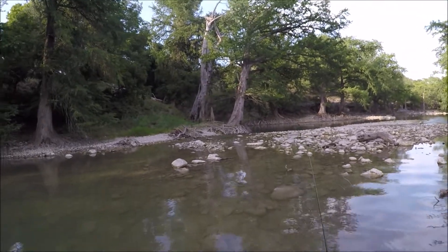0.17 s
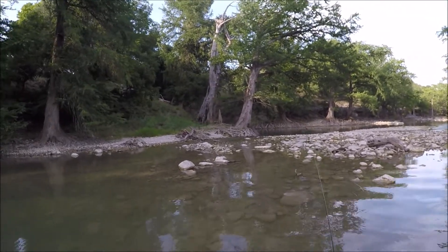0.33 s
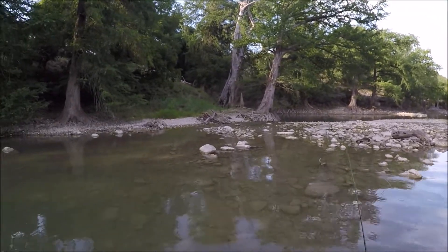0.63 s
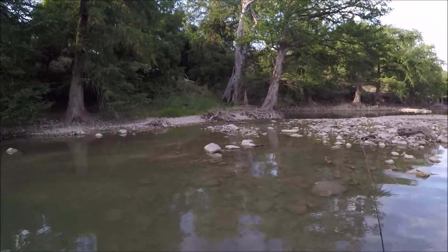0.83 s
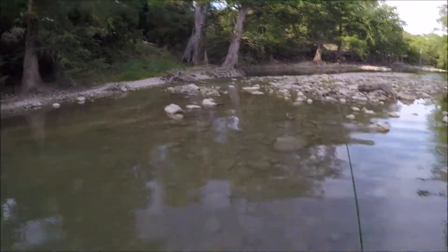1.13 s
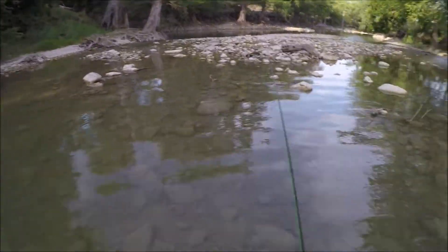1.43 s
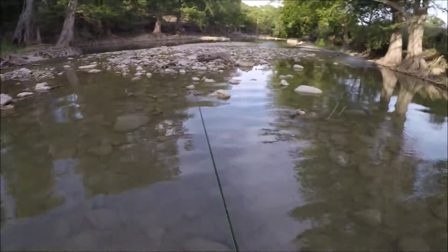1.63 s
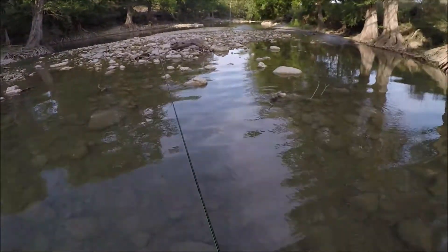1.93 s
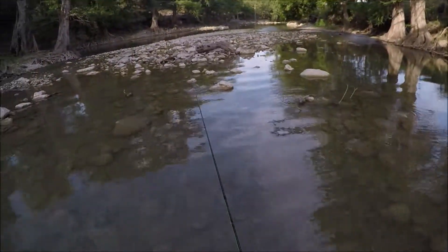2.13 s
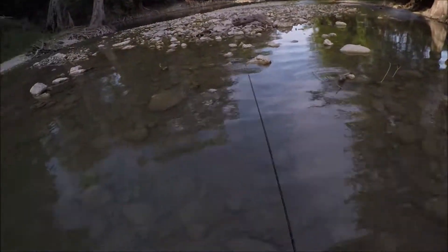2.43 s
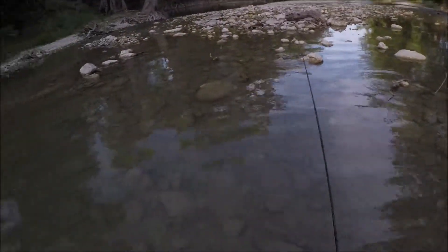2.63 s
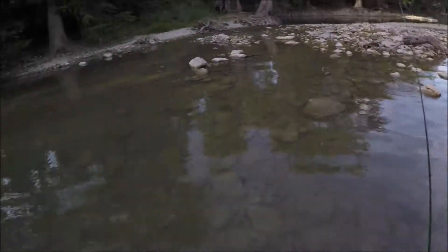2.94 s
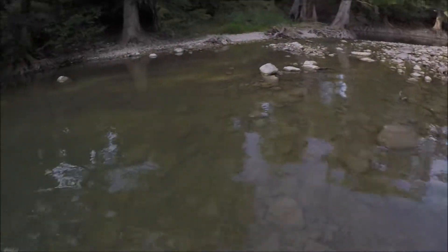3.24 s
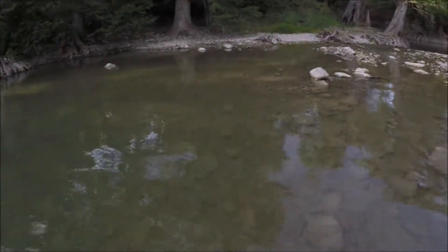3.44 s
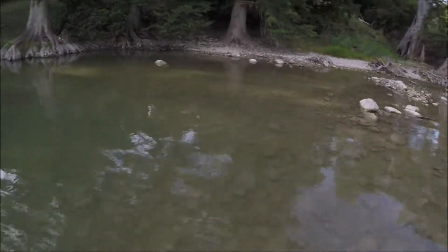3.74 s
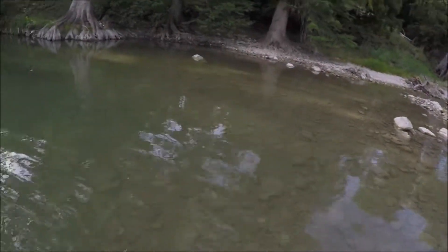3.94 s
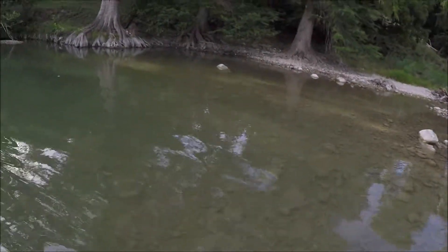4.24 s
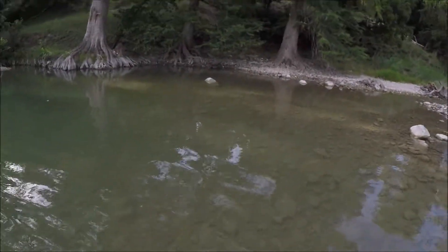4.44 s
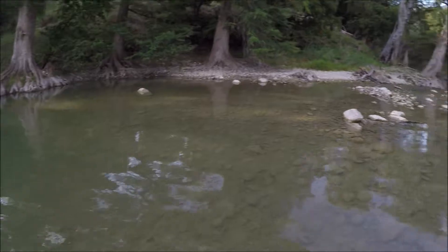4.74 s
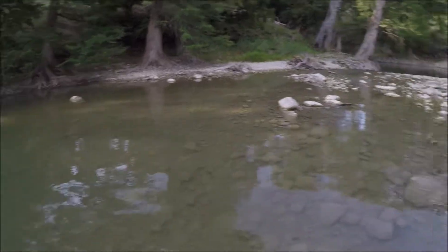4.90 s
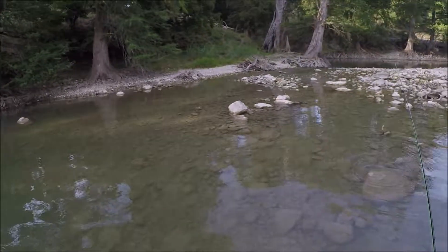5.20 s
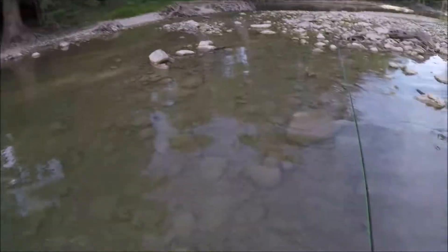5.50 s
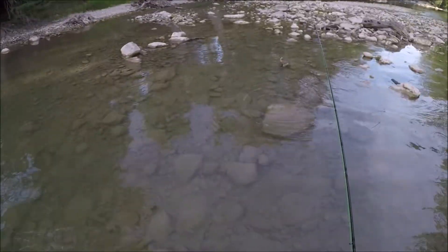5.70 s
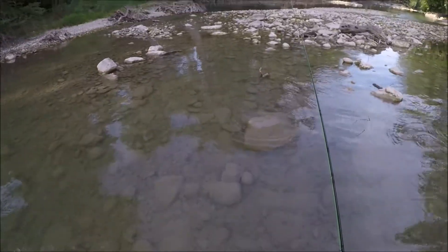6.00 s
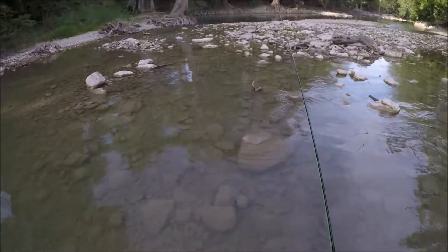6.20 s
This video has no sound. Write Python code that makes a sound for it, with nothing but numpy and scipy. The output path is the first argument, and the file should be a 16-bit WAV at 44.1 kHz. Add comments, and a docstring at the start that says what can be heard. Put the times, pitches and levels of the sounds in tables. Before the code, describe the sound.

Someone wades through a shallow river in slow strides, water sloshing, gurgling and dripping while wind buffets the microphone and a distant bird whistles.

```python
"""Someone wades through a shallow river: each stride churns the water, modelled as swarms of ringing
bubbles and shaped noise, and traps air pockets that gurgle upward in pitch; drops fall back as pings.
Stones knock underfoot and metal tackle ticks as damped modes; a far bird sings mostly falling whistles,
glided sines with tree echoes. Wind buffets the microphone over a river wash, both of filtered noise.
A worn camera adds a faint whine and limits the band."""
import sys
import numpy as np
from scipy import signal
from scipy.fft import rfft, irfft
from scipy.io import wavfile
from scipy.ndimage import uniform_filter1d

SR = 44100
rng = np.random.default_rng(int(sys.argv[2]) if len(sys.argv) > 2 else 0)


def waveform_to_disk(signal):
    """Save audio, clipped to [-1, 1], as 16-bit WAV at the path in sys.argv[1]."""
    frames = np.transpose(np.atleast_2d(signal))
    scaled = np.clip(frames, -1, 1) * 32767
    samples = np.round(scaled).astype(np.int16)
    wavfile.write(sys.argv[1], SR, samples)


N = 280476
TIME = np.arange(N) / SR


def amp(db):
    """Level to amplitude: 20 dB is a factor of ten."""
    return 10 ** (np.asarray(db) / 20)


def unit(x):
    """Normalization to an rms value of 1."""
    return x / np.sqrt(np.mean(x ** 2) + 1e-20)


def curve(rows, axis=1):
    """Linear interpolation of one column of a control table at every sample."""
    rows = np.asarray(rows)
    return np.interp(TIME, rows[:, 0], rows[:, axis])


def add(mix, s, sound):
    """Superposition: adds a sound to the mix, in place, from s seconds."""
    part = mix[max(round(s * SR), 0):][:len(sound)]
    part += sound[:len(part)]


def colour(x, points):
    """Minimum-phase filtering to a given spectrum: causal, so attacks stay sharp; rms 1."""
    hz, db = np.transpose(points)
    bins = abs(np.fft.fftfreq(16384, 1 / SR))
    log_gain = np.log(amp(np.interp(np.log(bins + 1), np.log(hz), db)))
    # the Hilbert transform of the log gain supplies the phase
    spectrum = np.exp(signal.hilbert(log_gain).conj())
    taps = np.fft.ifft(spectrum).real
    fade = np.hanning(len(taps))[len(taps) // 2:]
    return unit(signal.oaconvolve(x, taps[:len(fade)] * fade)[:N])


def drift(rate_hz):
    """Random modulation: noise under a Gaussian low-pass of the given rate, rms 1."""
    hz = np.fft.rfftfreq(N, 1 / SR)
    spectrum = rfft(rng.standard_normal(N)) * np.exp(-(hz / rate_hz) ** 2)
    return unit(irfft(spectrum, N))


def ping(hz, t60, rise=0, onset_cycles=2.16):
    """Damped oscillator with a gradual onset; its pitch rises by the share `rise` over t60 seconds."""
    t = np.arange(int(t60 * SR) + 2) / SR
    shape = (1 - np.exp(-t * hz / onset_cycles)) * amp(-60 * t / t60)
    return shape * np.sin(2 * np.pi * hz * t * (1 + rise * t / t60 / 2))


def swarm(low_hz, high_hz, per_s, cycles, rise, spread_db, count=48):
    """Shot noise of bubbles: many sizes, each born at random moments with random strength; rms 1."""
    out = np.zeros(N)
    for hz in np.geomspace(low_hz, high_hz, count):
        born = rng.random(N) < per_s / count / SR
        strength = amp(spread_db * np.minimum(rng.exponential(1, N)[born], 2.5))
        life, glide = rng.uniform(.6, 1.4, 2)
        clicks = np.zeros(N)
        clicks[born] = strength * hz / low_hz  # evens the power per Hz
        out += signal.oaconvolve(clicks, ping(hz, life * cycles / hz, rise * glide))[:N]
    return unit(out)


def woods(x, t60):
    """Multiple scattering from trees and banks: a sparse random impulse response that decays."""
    t = np.arange(SR) / SR
    tail = rng.standard_normal(SR) * (rng.random(SR) < 1 / 16) * amp(-60 * t / t60)
    return signal.fftconvolve(x, tail / np.linalg.norm(tail))[:N]


def stir(t, foamy=False):
    """Addition of powers: level in dB at times t of the water, or its foam, stirred by all strides."""
    # strides: start t/s, time to full speed/s, push length/s, level/dB, sag in the push/(dB/s),
    # extra foam level/dB
    strides = [(-.1, 0.063, 0.58, -47, 12.5, 5.5), (1.24, 0.085, 0.6, -47.5, 11, -4),
               (2.66, 0.18, 0.58, -36.5, 19.5, 1), (3.95, 0.1, 0.26, -45, 9, 2),
               (4.32, 0.051, 0.23, -47, 13, 1.5), (5.58, 0.073, 0.14, -45.5, 12, -5),
               (5.73, 0.12, 0.516, -39, 7.5, -5)]
    settle_db_per_s, lapping_db = 51, -60.5  # after the push the water settles to a faint lapping
    power = amp(lapping_db) ** 2
    for start, rise, push, db, sag, foam_db in strides:
        age = np.maximum(t - start, 0)
        fade_db = sag * np.minimum(age, push) + settle_db_per_s * np.maximum(age - push, 0)
        speed = np.minimum(age / rise, 1)
        power = power + (speed * amp(db + foamy * foam_db - fade_db)) ** 2
    return 10 * np.log10(power)


def chance(per_s, low_hz, high_hz, spread_db, lag=0):
    """Random thinning: small events at stirred-water level; rows of (t/s, level/dB, f/Hz, draw 0-1)."""
    when, keep, strength, size, free = rng.random((1200, 5)).T
    s = when * N / SR
    db = stir(s - lag) + spread_db * (2 * strength - 1)
    hz = low_hz * (high_hz / low_hz) ** size
    kept = keep < per_s * N / SR / len(s)
    return np.transpose([s, db, hz, free])[kept]


def river():
    """Broadband flow noise: the steady far-off wash of the shallows, with a slight ripple in level."""
    # distant riffles and leaves: f/Hz, relative spectral level per Hz/dB
    wash_colour = [(88, -6.5), (150, 3.5), (253, 1), (301, 1.5), (351, -0.5), (418, -4), (461, -10),
                   (762, -5.5), (1120, -11.5), (1240, -13), (2040, -6), (2700, -7.5), (3600, -9),
                   (4200, -13), (15300, -26)]
    level_db = -61
    ripple_db = .4 * drift(10)
    return colour(rng.standard_normal(N), wash_colour) * amp(level_db + ripple_db)


def eddies(points, steady=1.0):
    """Turbulence as low noise, its chance swells evened by a running power so that the gusts lead."""
    x = colour(rng.standard_normal(N), points)
    power = uniform_filter1d(abs(signal.hilbert(x)) ** 2, size=3000)
    return unit(x / power ** (steady / 2))


def wind(rumble_db=-1, flutter_db=-1, puff_db=1.9):
    """Turbulent pressure on the microphone: slow large eddies and quicker small ones, in puffs."""
    # gusts, before the gains above: t/s, rumble level/dB, flutter level/dB
    gust_levels = [(0.0, -49.5, -58), (0.16, -41, -55), (0.6, -37, -47.5), (0.77, -31.5, -53),
                   (0.83, -41, -61), (0.9, -31, -46), (0.99, -40, -69), (1.22, -54.5, -65),
                   (1.63, -34.5, -46), (2.39, -43.5, -62.5), (2.57, -43, -47.5), (2.6, -29, -66),
                   (2.76, -43, -48), (2.92, -30.5, -42.5), (3.27, -43, -48.5), (3.32, -35, -38),
                   (3.45, -28.5, -27.5), (3.53, -32, -35.5), (3.66, -23.5, -25.5), (3.73, -29.5, -28),
                   (3.8, -23.5, -25.5), (3.86, -35, -33), (3.94, -19.5, -27.5), (4.1, -27.5, -34),
                   (4.24, -30, -37.5), (4.3, -33, -33), (4.37, -21.5, -45), (4.44, -40.5, -51),
                   (4.57, -30, -48), (4.63, -41.5, -67), (5.1, -54.5, -62), (5.21, -38.5, -81),
                   (5.3, -47.5, -60), (5.35, -27, -44), (5.45, -54.5, -60), (6.11, -34.5, -57),
                   (6.25, -48, -49), (6.36, -20, -36)]
    # large eddies: f/Hz, relative spectral level per Hz/dB
    rumble_colour = [(10, -21.5), (22, 4.5), (38, 5.5), (52, -5), (66, -13), (100, -22.5), (200, -63),
                     (1000, -120)]
    # small eddies: f/Hz, relative spectral level per Hz/dB
    flutter_colour = [(35, -33), (64, 5.5), (80, -4), (110, -11.5), (150, -18.5), (200, -27.5), (300, -37),
                      (600, -59), (3000, -110)]
    rumble = eddies(rumble_colour) * amp(curve(gust_levels, axis=1) + rumble_db)
    flutter = eddies(flutter_colour) * amp(curve(gust_levels, axis=2) + flutter_db)
    return (rumble + flutter) * amp(puff_db * drift(13.0))


def bird(gain_db=-1):
    """Frequency-modulated tones: slurred whistles; the farther ones quaver more and echo off the trees."""
    # whistles: t/s, length/s, first f/Hz, last f/Hz, level before the gain/dB, share as echo 0-1
    whistles = [(2.195, .075, 4650, 4100, -64, .45), (5.228, .028, 6300, 7400, -64, .15),
                (5.315, .08, 5450, 4200, -59.5, .8), (5.495, .115, 5450, 4100, -59.5, .72),
                (5.718, .125, 5300, 3600, -56.5, .72), (5.97, .14, 4850, 3450, -55, .76),
                (6.222, .1, 5000, 3400, -53.5, .72)]
    direct, scattered = np.zeros(N), np.zeros(N)
    waver = .043 * drift(300)
    for s, length, first_hz, last_hz, db, far in whistles:
        u = np.linspace(0, 1, int(length * SR))
        quaver = 1 + far * np.interp(s + u * length, TIME, waver)
        hz = (first_hz + (last_hz - first_hz) * u ** (2 / 3)) * quaver
        shape = np.sqrt(abs(np.sin(np.pi * u ** 1.1)))
        note = amp(db + gain_db) * shape * np.sin(2 * np.pi * np.cumsum(hz) / SR)
        # direct and scattered shares divide the power
        add(direct, s, np.sqrt(1 - far) * note)
        add(scattered, s, np.sqrt(far) * note)
    return direct + woods(scattered, t60=.6)


def tackle(gain_db=-7.0, scrape_db=-4, scrape_t60=0.044):
    """Modal excitation: small metal parts scrape and ring, most in modes near the contact's pitch."""
    # ticks: t/s, level before the gains/dB, f that the contact excites most/Hz
    ticks = [(0.905, -56, 8000), (1.241, -55, 14400), (2.779, -65, 14000), (3.37, -46.5, 10900),
             (3.712, -53, 11000), (5.603, -48.5, 7100)]
    # modes of the metal: f/Hz, relative level/dB, t60/s
    modes = [(7120, 0, .15), (10250, -7, .04), (10420, -3, .05), (11280, -14, .05), (12390, -7, .12),
             (13620, -9, .09), (14300, -7, .08)]
    out, t = np.zeros(N), np.arange(SR // 8) / SR
    rasp = signal.butter(1, [9700, 11000], "band", fs=SR, output="sos")
    for s, db, contact_hz in ticks:
        for hz, mode_db, t60 in modes:
            aside_db = -13 * min(abs(hz - contact_hz) / 4500, 1)
            add(out, s, amp(db + gain_db + mode_db + aside_db) * ping(hz, t60, onset_cycles=29))
        noise = unit(signal.sosfilt(rasp, rng.standard_normal(len(t))))
        scrape = noise * (1 - np.exp(-t / 0.0029))
        add(out, s, amp(db + scrape_db - 60 * t / scrape_t60) * scrape)
    return out


def trickle(gain_db=-70):
    """Bubble resonance in steady flow: the current burbles over stones nearby, all the time."""
    bubbles = swarm(420, 2600, per_s=90, cycles=24, rise=.25, spread_db=3.5)
    return amp(gain_db) * colour(bubbles, [(300, -3), (900, 0.5), (3000, -9.5), (8000, -36)])


def knocks(gain_db=0, t60=0.029):
    """Damped impact: stones shift underfoot and the water muffles them to a short low ring."""
    # dull knocks of the boots on the riverbed: t/s, level/dB, f/Hz
    stones = [(0.259, -36, 210), (0.306, -33.5, 204), (.735, -42.5, 350), (0.786, -36.5, 254),
              (0.852, -37.5, 240), (0.894, -45, 148), (1.747, -42, 246), (3.13, -35.5, 218)]
    out = np.zeros(N)
    for s, db, hz in stones:
        add(out, s, amp(db + gain_db) * ping(hz, t60, onset_cycles=0.56))
    return out


def splashes(gain_db=-6, t60=0.05, width=1.37):
    """Impact noise: a lip of water slaps down in a short, decaying burst of band-passed hiss."""
    # small sharp splashes: t/s, level before the gain/dB, centre f/Hz
    slaps = [(.004, -41.5, 3000), (.138, -50, 900), (0.489, -38.5, 1460), (.618, -43.5, 1300),
             (1.317, -37, 600), (1.363, -45, 850), (1.438, -36.5, 700), (1.54, -36, 930), (1.564, -35, 700),
             (2.704, -39.5, 1700), (2.768, -39, 800), (3.242, -39, 1250), (4.062, -45.5, 3000),
             (4.11, -44.5, 2920), (4.169, -40, 850), (4.343, -31, 850), (4.491, -46, 1500),
             (5.608, -31, 910), (5.838, -37, 1500), (6.179, -32, 980)]
    out, t = np.zeros(N), np.arange(SR // 16) / SR
    for s, db, hz in slaps:
        band = signal.butter(2, [hz / width, hz * width], "band", fs=SR, output="sos")
        hiss = unit(signal.sosfilt(band, rng.standard_normal(len(t))))
        add(out, s, amp(db + gain_db - 60 * t / t60) * hiss)
    return out


def flurries(gain_db=0, per_s=900, spread_oct=0.355, cycles=24, rise=0.29):
    """Bubble-cloud noise: a folding wavelet sheds a dense cloud, smaller and mostly higher as it closes."""
    # folding wavelets: t/s, length/s, level/dB, first centre f/Hz, last centre f/Hz
    folds = [(.165, .045, -45.5, 704, 1160), (0.299, .05, -52, 850, 1150), (1.371, .055, -51, 810, 1300),
             (1.434, .03, -52.5, 890, 1260), (2.834, .09, -45, 850, 1160), (3.113, .08, -52, 840, 1100),
             (4.429, .065, -49, 670, 1300), (5.68, .025, -46.5, 786, 1100), (5.931, .12, -51.5, 1150, 1345),
             (6.18, .055, -44.5, 853, 970), (6.278, .08, -52.5, 1000, 1140)]
    out = np.zeros(N)
    for s, length, db, first_hz, last_hz in folds:
        cloud, count = np.zeros(SR // 4), max(int(per_s * length), 2)
        size, strength = rng.standard_normal((2, 600))
        for u, octaves, push in zip(rng.random(600)[:count], size, strength):
            hz = first_hz * (last_hz / first_hz) ** u * 2 ** (spread_oct * octaves)
            bubble = ping(hz, cycles / hz, rise)
            add(cloud, u * length, push * np.sqrt(np.sin(np.pi * u)) * bubble)
        # the level is the rms over the flurry's length, not over the whole buffer
        add(out, s, amp(db + gain_db) * unit(cloud) * np.sqrt(length * SR / len(cloud)))
    return out


def foam(gain_db=-14.0, clump_db=2):
    """Resonance of fine bubbles that burst in the wake of each leg, in quick clumps."""
    # colour of the fine bubbles: f/Hz, relative spectral level per Hz/dB
    foam_colour = [(500, -47), (900, -15), (1300, -1), (1800, -3), (2500, -9.5), (3500, -15), (6000, -49),
                   (12000, -42)]
    bubbles = swarm(1000, 4500, per_s=330, cycles=40, rise=.25, spread_db=3.5)
    level_db = stir(TIME, foamy=True) + gain_db + clump_db * drift(32)
    return colour(bubbles, foam_colour) * amp(level_db)


def drops(gain_db=0, rise=0.068):
    """Entrained-bubble resonance: each drop traps one tiny bubble, near by or pattering after a stride."""
    # drops that land close by: t/s, level/dB, f/Hz
    near_drops = [(.1251, -39, 3510), (0.171, -28, 1510), (.2374, -41, 3710), (0.199, -26, 1650),
                  (.2733, -36, 2840), (.277, -27.5, 1210), (0.328, -40, 1431), (.414, -31, 1430),
                  (0.471, -36, 2430), (0.53, -35, 2030), (0.575, -34.5, 2308), (0.6179, -34, 1760),
                  (.91, -35, 1190), (1.291, -32.5, 2450), (1.402, -41, 1530), (1.54, -39, 1280),
                  (1.65, -35, 2310), (1.656, -27, 1140), (1.836, -36, 1950), (1.869, -31, 1180),
                  (1.878, -36, 2100), (1.944, -32.5, 1280), (1.97, -39, 1270), (2.738, -26, 1420),
                  (2.805, -27, 1340), (2.827, -38, 3630), (2.83, -29, 4970), (2.996, -30, 1600),
                  (3.003, -25.5, 2680), (3.03, -28, 1390), (3.057, -37, 2100), (3.083, -38, 1540),
                  (3.118, -31, 1160), (3.149, -27, 1070), (3.243, -38, 1600), (3.26, -32.5, 2000),
                  (3.292, -35, 3650), (3.9597, -32, 3830), (3.9805, -36, 5745), (3.957, -30.5, 1300),
                  (4.03, -31, 1390), (4.033, -33, 1930), (4.064, -29, 1580), (4.1125, -33, 1890),
                  (4.2894, -31.5, 2560), (4.477, -31, 1200), (4.492, -27, 1587), (4.547, -34, 1540),
                  (4.655, -31, 1410), (4.6887, -31.5, 1160), (5.449, -40, 1090), (5.497, -38, 1150),
                  (5.632, -28.5, 1940), (5.6536, -30, 2460), (5.663, -36, 3850), (5.73, -33, 5200),
                  (5.7665, -33, 5760), (5.795, -25.5, 2220), (5.8684, -28, 3680), (5.843, -23, 1380),
                  (5.894, -27, 1520), (5.961, -25, 1430), (6.0093, -28, 1720), (6.038, -24.5, 1120),
                  (6.071, -24.5, 1370), (6.181, -28, 1090), (6.186, -38, 3420), (6.23, -34, 2200),
                  (6.2297, -36, 3470)]
    ring_cycles = 15.1  # a near drop rings for this many cycles, whatever its size
    drip_db, low_hz, high_hz = 3, 976, 3900  # lesser drops: level over the stirred water, pitch range
    fall_s = 0.1  # time in the air after the leg has passed
    out = np.zeros(N)
    for s, db, hz in near_drops:
        add(out, s, amp(db + gain_db) * ping(hz, ring_cycles / hz, rise))
    for s, db, hz, free in chance(65, low_hz, high_hz, spread_db=6.5, lag=fall_s):
        strength = amp(db + drip_db) * low_hz / hz  # smaller drops are weaker
        add(out, s, strength * ping(hz, ring_cycles * (1 + free) / hz, rise))
    return out


def churn(bubble_db=-4.0, spray_db=-18.0, wash_db=-9.5, clump_db=2, spray_growth=0.84, wash_growth=1.18):
    """Bubble and turbulence noise of stirred water: small bubbles, crackling spray, soft wash, in clumps."""
    # colour of the stirred water: f/Hz, relative spectral level per Hz/dB
    slosh_colour = [(150, -18), (260, -31.5), (420, -1), (600, 1.5), (850, 3.5), (1150, -8), (1600, -13),
                    (2300, -25), (3500, -24), (5500, -30), (8000, -39), (15000, -44)]
    # colour of the spray: f/Hz, relative spectral level per Hz/dB
    spray_colour = [(150, -16), (420, -6), (850, 12), (1600, -13), (2300, -26.5), (3500, -27), (5500, -30),
                    (8000, -37.5), (15000, -41)]
    stir_db = stir(TIME)
    top_db = stir_db.max()
    bubbles = swarm(300, 3600, per_s=900, cycles=40, rise=.4, spread_db=3.2, count=64)
    spray = swarm(1500, 12500, per_s=1500, cycles=22, rise=.2, spread_db=4.0)
    body = colour(bubbles, slosh_colour) * amp(bubble_db + stir_db)
    # below the hardest stroke the wash falls faster than the bubbles, the spray more slowly
    wash_level_db = wash_db + top_db + wash_growth * (stir_db - top_db)
    wash = colour(rng.standard_normal(N), slosh_colour) * amp(wash_level_db)
    spray_level_db = spray_db + top_db + spray_growth * (stir_db - top_db)
    thrown = colour(spray, spray_colour) * amp(spray_level_db)
    return (body + wash + thrown) * amp(clump_db * drift(23))


def gulps(gain_db=0, wobble=0.029, flutter_db=1.38, pinch=0.15, pinch_s=0.0041):
    """Volume resonance of trapped air: pockets ring higher and higher as they near the surface."""
    # largest pockets, before waver, pinch and flutter: t/s, level/dB, first f/Hz, length/s,
    # share of the length spent swelling
    pockets = [(.049, -29.5, 655, 0.029, 0.56), (.05, -37, 556, 0.012, 0.069),
               (0.121, -39.5, 407.7, 0.095, 0.063), (0.138, -39, 780, 0.012, .05),
               (0.17, -33, 860, 0.018, 0.032), (0.326, -41, 930, 0.013, 0.15),
               (0.36, -43.5, 485, 0.032, 0.45), (0.379, -51, 250, 0.094, 0.24),
               (0.468, -46, 526, .018, 0.54), (.494, -42.5, 473, 0.043, 0.1),
               (0.518, -45.5, 569, 0.045, 0.045), (0.493, -43, 742, 0.042, .04),
               (0.615, -40, 850, 0.016, .04), (0.644, -52, 860, 0.067, 0.38),
               (1.098, -52, 833, 0.021, 0.16), (1.202, -33.5, 273, 0.034, 0.84),
               (1.205, -49.5, 1030, 0.019, 0.41), (1.23, -48, 312, 0.15, 0.19),
               (1.319, -35.5, 386, 0.062, 0.045), (1.368, -34.5, 725, 0.0086, 0.079),
               (1.422, -38, 407.2, 0.042, 0.69), (1.439, -36, 495, 0.018, 0.089),
               (1.537, -41, 426, 0.087, 0.07), (1.54, -37.5, 837, 0.018, 0.058),
               (1.559, -36, 816, 0.012, 0.062), (1.575, -51, 963, 0.039, .4),
               (1.652, -39, 598, 0.042, 0.31), (1.698, -43.5, 744, 0.019, 0.15),
               (1.851, -42, 854, 0.01, 0.39), (2.28, -52, 742, 0.034, 0.3), (2.65, -43.5, 694, 0.046, 0.23),
               (2.702, -37.5, 1024, 0.054, 0.036), (2.718, -36.5, 413, 0.04, 0.069),
               (2.722, -33.5, 666, 0.019, 0.68), (2.766, -37.5, 750, 0.024, 0.12),
               (2.768, -40, 227.4, 0.25, 0.08), (2.815, -35, 527, 0.024, 0.22),
               (2.825, -37, 708, 0.018, 0.066), (2.882, -31.5, 258, 0.029, 0.68),
               (2.957, -35, 770, 0.0072, 0.22), (2.981, -33, 795, 0.028, 0.4),
               (2.987, -45, 378, 0.032, 0.26), (3.089, -32, 490, 0.016, 0.035),
               (3.098, -33, 610, 0.027, 0.73), (3.216, -44, 405, 0.036, 0.41),
               (3.244, -32.5, 750, 0.0068, 0.043), (3.248, -49, 376, .05, .05),
               (3.262, -42, 770, 0.021, 0.09), (3.87, -50, 650, 0.099, 0.23), (3.99, -41, 686, 0.022, 0.43),
               (4.027, -47.5, 450, 0.046, 0.32), (4.069, -29, 900, 0.01, 0.15),
               (4.07, -37, 752, 0.029, 0.037), (4.112, -34, 750, 0.041, 0.035),
               (4.113, -41.5, 477.6, 0.13, 0.043), (4.165, -43, 673, 0.039, .05),
               (4.245, -36, 360, 0.083, 0.54), (4.341, -34.5, 994, 0.013, 0.089),
               (4.355, -31.5, 512, 0.018, 0.19), (4.403, -41, 370, 0.022, .15),
               (4.422, -44.5, 429, 0.036, 0.51), (4.492, -35, 370, 0.023, 0.049),
               (4.505, -48, 575, 0.023, 0.54), (4.529, -43, 307, 0.054, .05),
               (4.597, -43, 776, 0.016, 0.17), (4.606, -46.5, 653, 0.028, 0.3),
               (4.653, -48, 352, 0.034, 0.18), (4.742, -44, 760, 0.015, 0.35),
               (5.611, -29.5, 445, 0.018, 0.82), (5.613, -39.5, 414, 0.018, 0.088),
               (5.619, -33, 716, 0.016, 0.62), (5.657, -37, 1005, 0.035, 0.15),
               (5.635, -39.5, 561, 0.066, 0.049), (5.661, -26, 455, 0.018, 0.089),
               (5.671, -29, 617, 0.017, 0.66), (5.685, -29, 588, 0.021, 0.087),
               (5.73, -42.5, 470, 0.019, .1), (5.785, -40.5, 268, 0.17, 0.023),
               (5.894, -33.5, 832, 0.021, 0.044), (5.907, -32.5, 820, 0.0078, 0.34),
               (5.933, -38, 460, 0.016, 0.28), (5.996, -38.5, 620, 0.025, 0.55),
               (6.061, -32.5, 429, 0.048, 0.51), (6.141, -35.5, 790, 0.028, 0.06),
               (6.143, -35.5, 540, .025, 0.23), (6.205, -36.5, 556, 0.07, 0.022)]
    # the pitch climbs as long as a pocket rings, and further if it swells toward the surface
    climb_oct_per_s, swell_oct = 6.0, 0.806
    # lesser pockets come by chance: level over the stirred water, typical length
    lesser_db, lesser_s = -1, 0.017
    out, waver, shake = np.zeros(N), wobble * drift(66), amp(flutter_db * drift(187))
    lesser = [(s, db + lesser_db, hz, lesser_s * (.5 + free), (1 - free) ** 2 / 2)
              for s, db, hz, free in chance(44, 338, 1103, spread_db=2.5)]
    for s, db, first_hz, length, swell in [*pockets, *lesser]:
        u = np.linspace(0, 1, int(length * SR))
        swell = np.clip(swell, .02, .9)
        octaves = climb_oct_per_s * length + swell_oct * swell
        hz = first_hz * 2 ** (octaves * u ** 1.144)
        hz = hz * (1 + np.interp(s + u * length, TIME, waver))
        # a pocket that pinches off at once starts with a jump, one that swells starts softly
        jump = .85 * (1 - swell) ** 2
        # and it rings sharp until its neck has closed
        hz = hz * (1 + pinch * jump * np.exp(-u * length / pinch_s))
        swelling = jump + (1 - jump) * u / swell
        dying = ((1 - u) / (1 - swell)) ** 1.14
        shape = np.minimum(swelling, dying)
        add(out, s, amp(db + gain_db) * shape * np.sin(2 * np.pi * np.cumsum(hz) / SR))
    return out * shake


def scene():
    """Superposition: water at the legs, its faint echo from the banks, and the open air around."""
    water = gulps() + churn() + foam() + trickle() + drops() + flurries() + splashes() + knocks()
    echo = amp(-15.5) * woods(water, t60=0.21)
    return (water + echo + tackle() + bird() + wind() + river())[None]


def record(dry):
    """Band limitation: the camera adds a faint whine and a low-pass; the sound ends softly."""
    # faint electronic tones: f/Hz, rms level/dB
    tones = [(7128, -94), (8631, -89)]
    edge_hz = 15350
    whine = sum(amp(db) * np.sqrt(2) * np.sin(2 * np.pi * hz * TIME) for hz, db in tones)
    low_pass = signal.firwin(1023, edge_hz, window=("kaiser", 9), fs=SR)
    ending = np.minimum((TIME[-1] - TIME) / .008, 1)
    return signal.oaconvolve((dry + whine) * ending, low_pass[None], "same")


dry = scene()
out = record(dry)
waveform_to_disk(out)
```